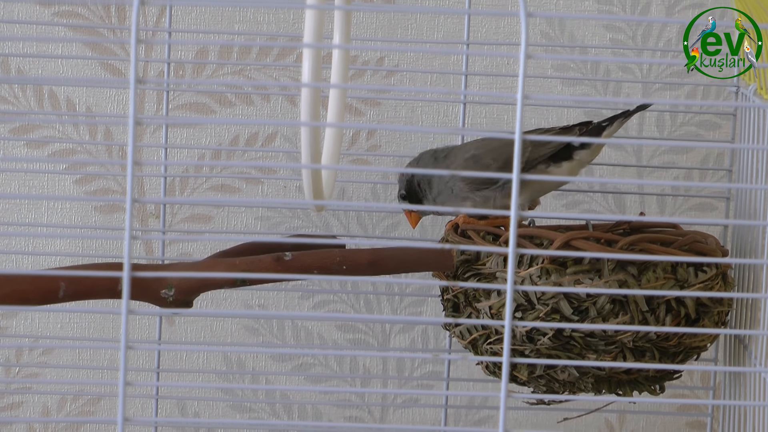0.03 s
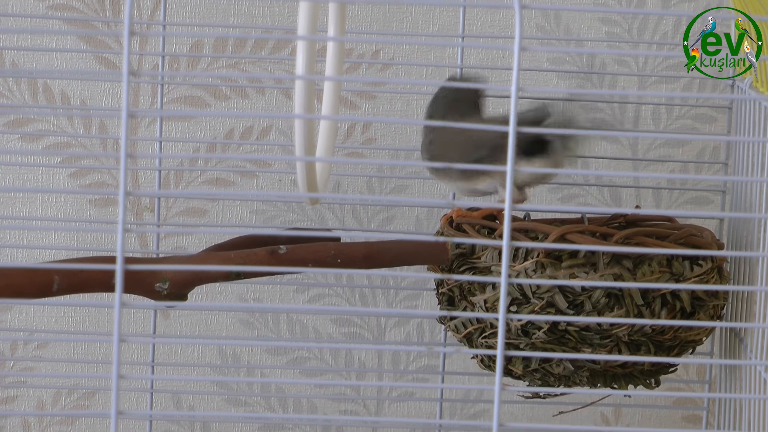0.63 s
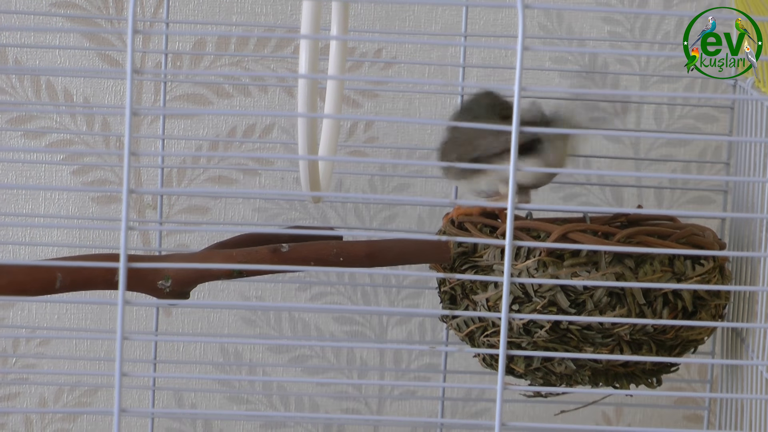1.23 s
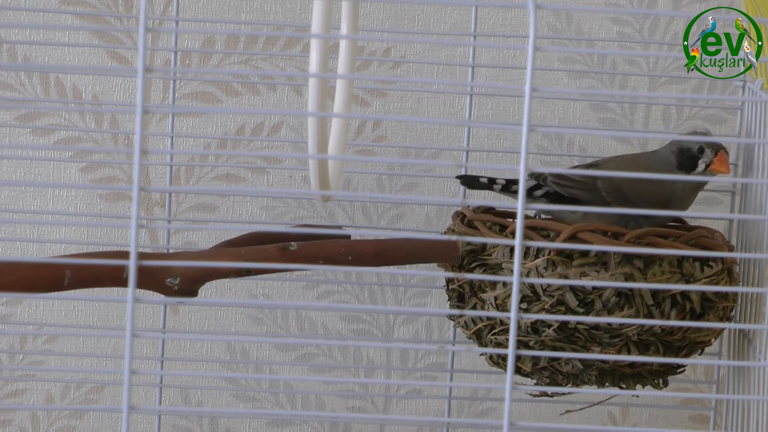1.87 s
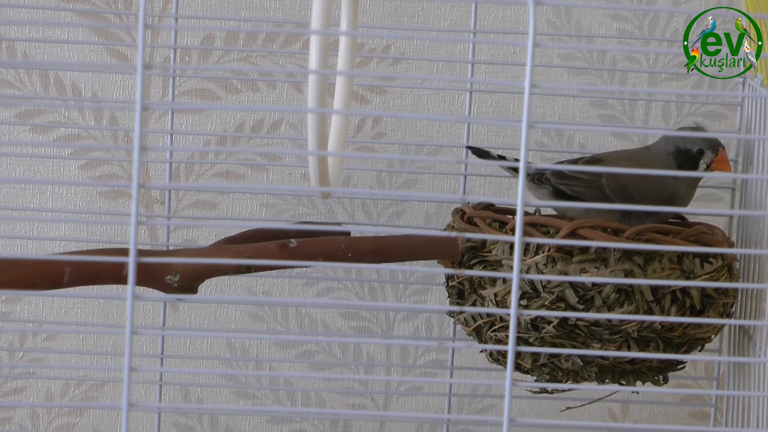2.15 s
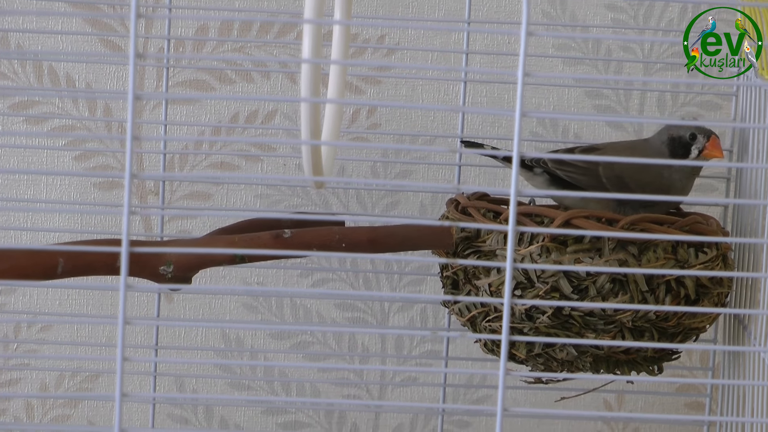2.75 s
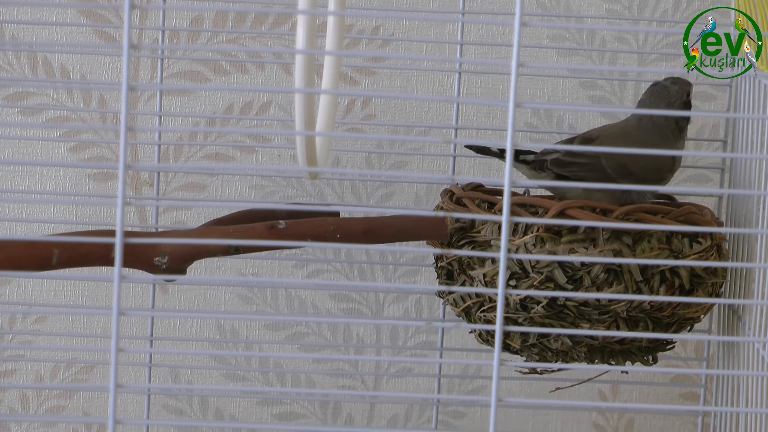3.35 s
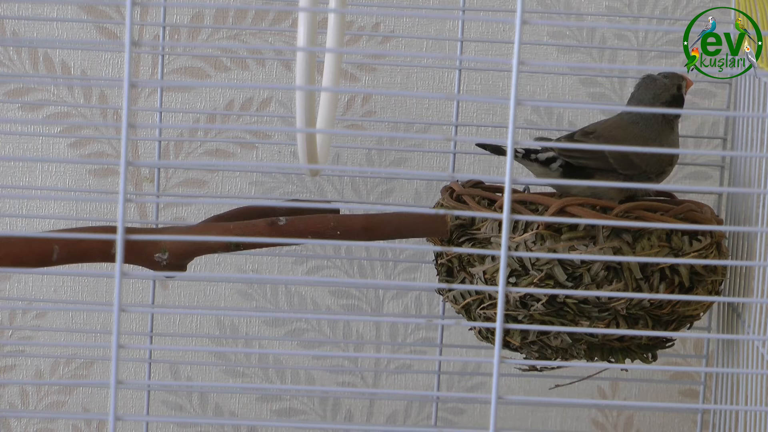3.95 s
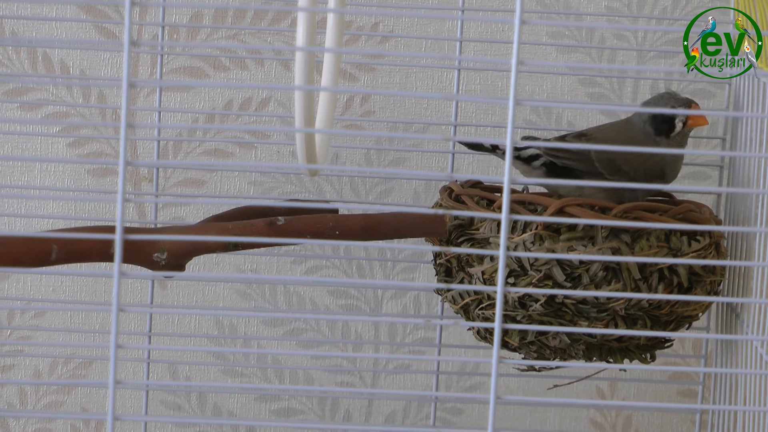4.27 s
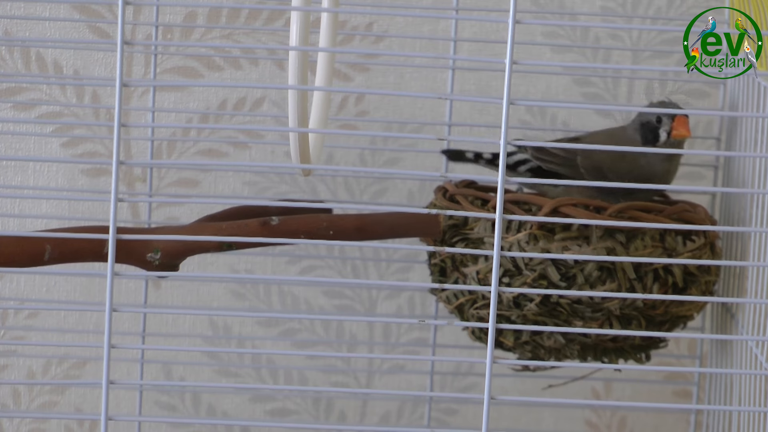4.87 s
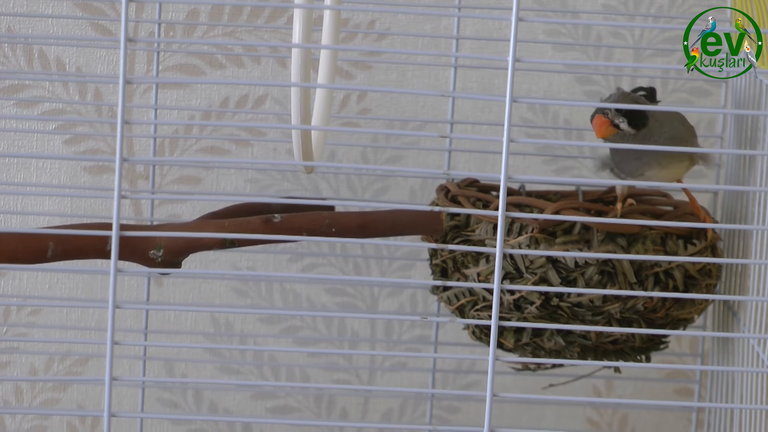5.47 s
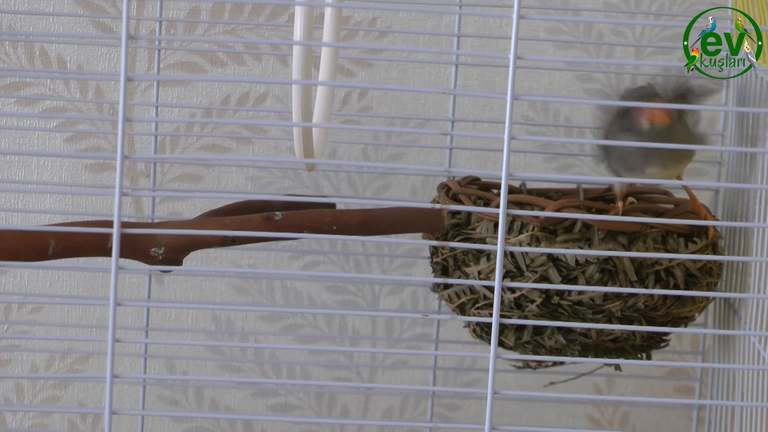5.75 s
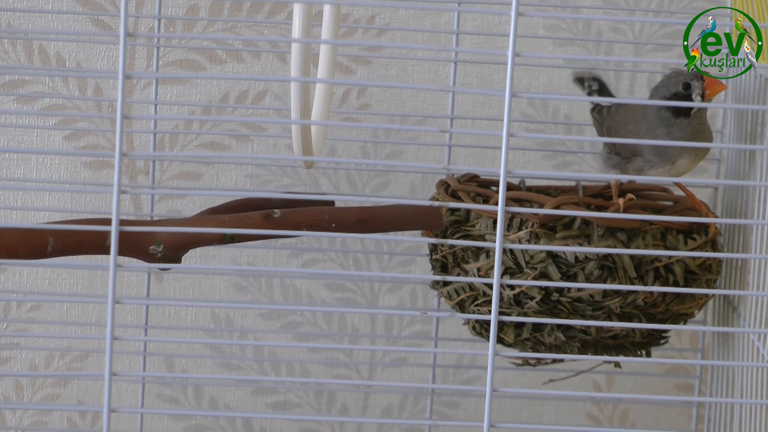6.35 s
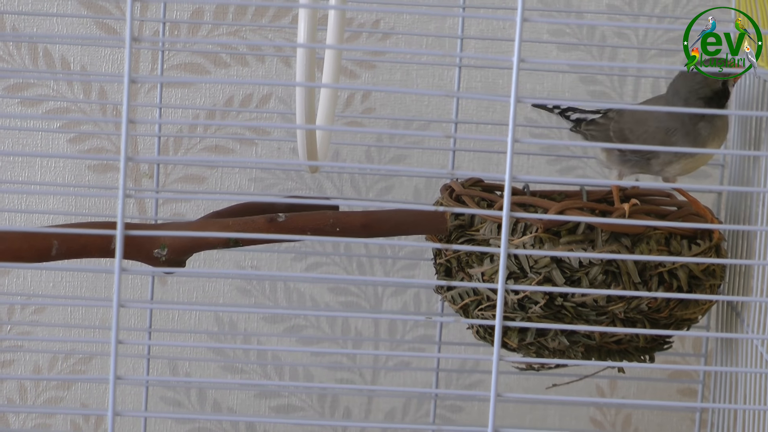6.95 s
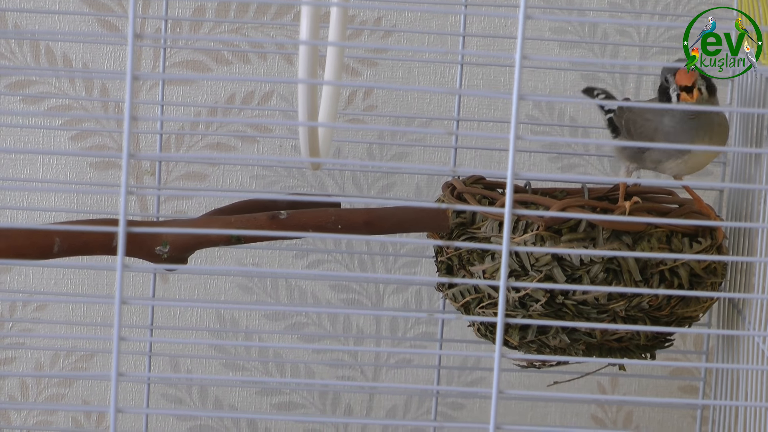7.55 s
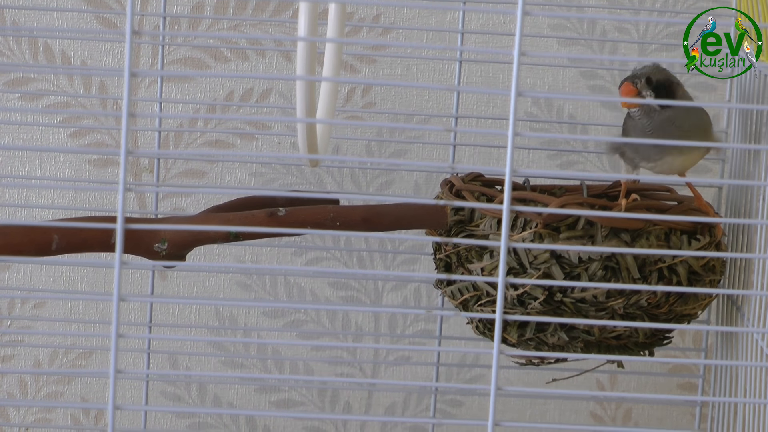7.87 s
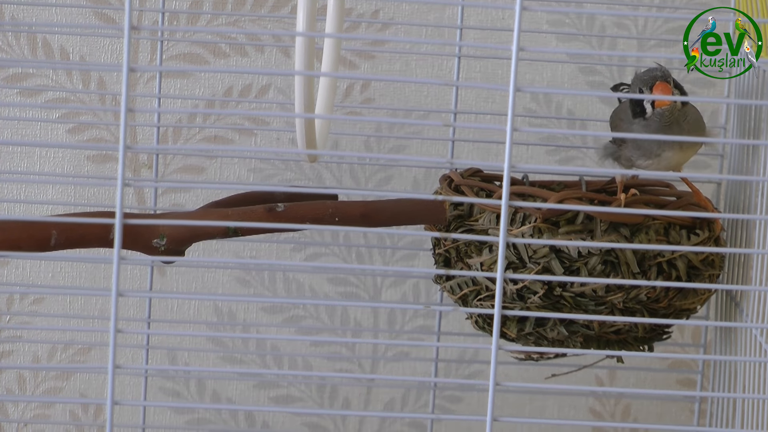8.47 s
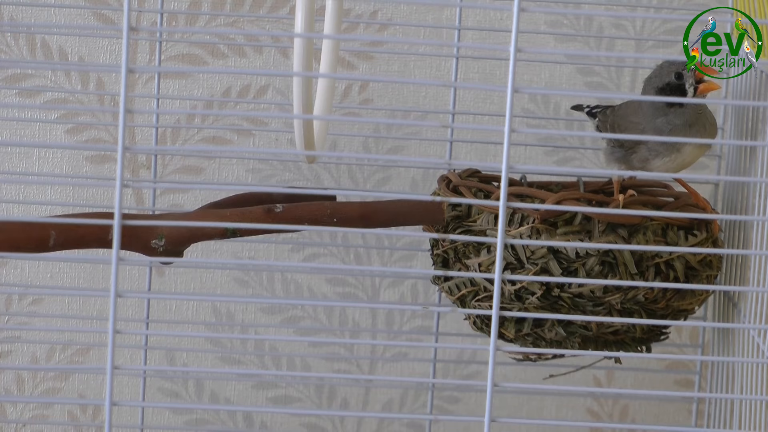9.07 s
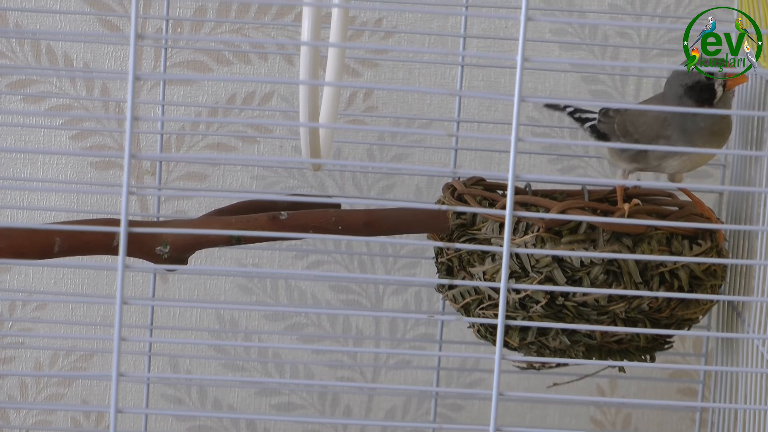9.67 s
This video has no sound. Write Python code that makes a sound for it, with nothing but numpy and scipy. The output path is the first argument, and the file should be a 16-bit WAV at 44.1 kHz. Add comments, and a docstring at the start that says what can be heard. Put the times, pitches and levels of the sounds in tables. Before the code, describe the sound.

A small finch calls close by in a cage, over faint indoor hum and hiss. Its soft, nasal, arching whines come at about 0.2, 1.2, 2.7, 3.5, 4, 5.4 and 7.3 seconds. Short notes break into high whistles near 0.4, 2.4, 3, 5.3 and 7.2 seconds. A second finch, further off, slightly right and more echoing, gives brief rasps at 0.3, 1.4 and 3.4 seconds and soft replies at 0.9, 1.7 and 4.5 seconds. Its three louder buzzy calls, at 5.9, 7.9 and 9.7 seconds, stand out most. Feathers rustle lightly on the wicker nest through the first six seconds, with a few claw ticks. From 4 to 4.7 seconds wings whirr in a quick flurry, puffing air at the microphone. A faint air rumble lies between 3 and 6 seconds.

```python
"""A soft, arched whine rises over quiet room hum: a zebra finch on its wicker nest in a wire cage.
Its short notes break into whistles; its mate answers from further off with louder calls and rasps.
Each call is a buzz of the syrinx shaped by the throat, each rasp a burst of chaotic pulses.
Feathers rustle, claws catch, and wings whirr and puff air at the microphone."""
import sys
import numpy as np
from scipy import signal
from scipy.fft import rfft, irfft, next_fast_len
from scipy.io import wavfile

SR = 44100
rng = np.random.default_rng(int(sys.argv[2]) if len(sys.argv) > 2 else 0)


def transcribe(signal):
    """Save signal, clipped to [-1, 1], as a 16-bit WAV file at the path in sys.argv[1]."""
    frames = np.atleast_2d(signal).T
    limited = np.clip(frames, -1, 1)
    pcm = np.round(limited * 32767).astype(np.int16)
    wavfile.write(sys.argv[1], SR, pcm)


N = 429081
TIME = np.arange(N) / SR


def amp(db):
    """Decibels to gain."""
    return 10 ** (np.asarray(db) / 20)


def unit(x):
    """Scales to rms 1."""
    return x / np.sqrt(np.mean(x ** 2) + 1e-20)


def read(points, hz):
    """Reads a curve on a log-frequency axis."""
    f, value = np.transpose(points)
    return np.interp(np.log(hz + 1), np.log(f + 1), value)


def follow(rows):
    """Sample times over a table's span, and its columns along them."""
    s, *columns = np.transpose(rows)
    t = np.arange(s[0], s[-1], 1 / SR)
    return [t] + [np.interp(t, s, c) for c in columns]


def add(mix, s, sound):
    """Mixes a sound in at time s."""
    part = mix[..., max(round(s * SR), 0):][..., :sound.shape[-1]]
    part += sound[..., :part.shape[-1]]


def equalise(x, eq):
    """Shapes x with an EQ curve, at rms 1."""
    return unit(irfft(rfft(x) * amp(read(eq, np.fft.rfftfreq(len(x), 1 / SR))), len(x)))


def noise(n, eq):
    """Noise through an EQ curve, at rms 1."""
    return equalise(rng.standard_normal(n), eq)


def wander(n, hz):
    """Random modulation of rms 1, rolling off above hz."""
    size = next_fast_len(n + 8192)
    f = np.fft.rfftfreq(size, 1 / SR)
    return unit(irfft(rfft(rng.standard_normal(size)) / (1 + (f / hz) ** 4), size))[:n]


def fade(t, edge_s):
    """Short ramps at both ends of a call."""
    return np.clip(np.minimum(t - t[0], t[-1] - t) / edge_s, 0, 1)


# reverb time of the room: (f/Hz, T60/s)
ROOM_DECAY = [(300, 0.44), (1200, .44), (3000, 0.4727), (5000, 0.48), (8000, 0.38), (14000, 0.29)]
def room(x, direct_db, cage_db, tail_db, cage_decay_s, width):
    """Direct sound, quick echoes from the cage corner and the room's tail, in narrow stereo."""
    size = 26400
    taps = np.zeros((2, size))
    slots = np.arange(88, size - 20, 20)  # one reflection of random sign in each
    shape = (2, len(slots))
    np.put_along_axis(taps, slots + rng.integers(0, 20, shape), rng.choice([-1., 1.], shape), 1)
    hz, t, spectra = signal.stft(taps, SR, nperseg=256)
    damping = amp(-60 * t / read(ROOM_DECAY, hz)[:, None])
    tail = signal.istft(spectra * damping, SR, nperseg=256)[1][:, :size]
    cage = taps * np.exp(-TIME[:size] / cage_decay_s)
    echoes = amp(tail_db) * tail / np.linalg.norm(tail[0])
    echoes += amp(cage_db) * cage / np.linalg.norm(cage[0])
    mid, side = signal.oaconvolve(x[None], echoes, axes=1)[:, :N]
    return amp(direct_db) * x + mid + width * np.array([side, -side])


# noise bed of the room: (f/Hz, gain/dB)
BED_EQ = [(12, -55), (20, -18), (36, -13), (113, -6.5), (176, -7), (203, -3), (268, -8.5), (291, -6.5),
          (385, -11), (481, -21.5), (538, -16), (602, -19.5), (818, -13.5), (915, -36), (994, -22),
          (1310, -25), (1790, -21.5), (2170, -21), (15800, -34.5)]
# its stereo image: (f/Hz, left-right correlation/0-1)
BED_CORRELATION = [(60, 0.19), (130, 0.79), (290, 0.31), (640, 0.31), (1410, 0.77), (3100, 0.916),
                   (6820, 0.921), (15000, 1)]
# thin drones: (f/Hz, level/dB)
DRONES = [(204.6, -73), (640.6, -78.5), (839.8, -75), (1680, -84), (1814, -81)]
# a low hum that swells and dies away: (t/s, f/Hz, level/dB)
PASSING_HUM = [(.48, 134.4, -65), (.58, 126.3, -60), (.68, 111.1, -62), (.77, 102.7, -44),
               (.9, 104.4, -50.5), (1.05, 99.3, -60.5), (1.3, 102.4, -69), (1.4, 125.7, -57),
               (1.55, 117, -70)]
def room_tone(bed_db=-59, ring_t60_s=.5):
    """Steady hiss, wavering drones, a passing hum, and the dying ring of an earlier call."""
    mid, side = noise(N, BED_EQ), noise(N, BED_EQ)
    correlation = np.clip(read(BED_CORRELATION, np.fft.rfftfreq(N, 1 / SR)), 0, 1)
    mid = irfft(rfft(mid) * np.sqrt((1 + correlation) / 2), N)
    side = irfft(rfft(side) * np.sqrt((1 - correlation) / 2), N)
    out = amp(bed_db) * np.array([mid + side, mid - side])
    for hz, db in DRONES:
        out += amp(db) * unit(np.sin(2 * np.pi * hz * TIME + 1.08 * wander(N, 3.6)))
    t, hz, level_db = follow(PASSING_HUM)
    hum = np.sin(2 * np.pi * np.cumsum(hz) / SR + .55 * wander(len(t), 22))
    add(out, t[0], amp(level_db) * unit(hum))
    ring_eq = [(1000, -20.5), (2200, -2), (3000, 4), (4200, -1.5), (5500, -17.5), (9000, -39.5)]
    ring = noise(16384, ring_eq)
    add(out, 0, amp(-45 - 60 * TIME[:len(ring)] / ring_t60_s) * ring)
    return out


# fader ride of the draught: (t/s, level/dB)
DRAUGHT_RIDE = [(2.1, -74), (2.75, -73), (2.9, -57), (3.7, -59.5), (4, -60), (4.8, -55.5), (5.1, -61.5),
                (5.35, -54.5), (5.9, -73.5)]
# its rumble: (f/Hz, gain/dB)
DRAUGHT_EQ = [(15, -6), (30, -1), (50, -16), (150, -14.5), (300, -31), (1000, -70.5)]
def draught():
    """Slow air rumbles on the microphone."""
    out = np.zeros(N)
    t, level_db = follow(DRAUGHT_RIDE)
    add(out, t[0], amp(level_db) * noise(N, DRAUGHT_EQ)[:len(t)])
    return out


# soft wafts as the bird shifts on the nest: (t/s, level/dB, rise and decay/s)
NEST_WAFTS = [(3.096, -60, 0.042), (3.271, -65, 0.023), (4.799, -63.5, 0.008), (5.324, -57.5, 0.036)]
# dull thud of moving air: (f/Hz, gain/dB)
PUFF_EQ = [(25, -2), (60, 1), (130, 1.5), (300, -4), (600, -9.5), (1200, -18), (2500, -18), (6000, -58)]
def air_puffs(wing_puffs):
    """Air pushed by wings and body swells and fades on the microphone."""
    out, t = np.zeros(N), np.arange(-2048, 2048) / SR
    for s, db, decay_s in wing_puffs + NEST_WAFTS:
        add(out, s + t[0], amp(db) * np.exp(-abs(t) / decay_s) * noise(len(t), PUFF_EQ))
    return out


def feathers(bouts, eq, grain_db, grain_hz):
    """Barbs slide over each other in a grainy hiss; each bout rises, holds and dies away."""
    envelope = np.zeros(N)
    for s, attack, hold, decay, db in bouts:
        rise = np.clip((TIME - s) / attack, 0, 1)
        envelope += amp(db) * rise * np.exp(-np.maximum(TIME - s - attack - hold, 0) / decay)
    return envelope * unit(noise(N, eq) * amp(grain_db * wander(N, grain_hz)))


# rustles in plumage and nest, and wing whirrs: (t/s, attack/s, hold/s, decay/s, level/dB)
RUSTLES = [(.57, 0.022, 0.0766, 0.104, -53.5), (1.3, 0.116, .01, 0.057, -47.5),
           (1.6, 0.029, 0.021, 0.178, -54), (2.7, .2, 2.7, .2, -60), (5, 0.0207, 0.016, 0.054, -58)]
WHIRRS = [(4.03, 0.09, .02, 0.0266, -47), (4.22, 0.043, 0.157, 0.0545, -46.5),
          (4.47, 0.129, 0.052, 0.025, -47.5)]
# their tone: (f/Hz, gain/dB)
RUSTLE_EQ = [(800, -8.5), (1600, -11), (2800, -2), (4300, -8), (5500, -4), (6500, -5), (8300, -17),
             (10500, -16.5), (15500, -18.5)]
WHIRR_EQ = [(710, -47), (1200, -7.5), (1410, -15), (1940, -6), (3320, -39), (3850, -10.5), (4930, -7),
            (6370, -5), (7410, 5.5), (9680, -11), (15500, -20.5)]
def plumage():
    """Feathers rub: a fine rustle on the nest, a coarser whirr from the wings."""
    rustle = feathers(RUSTLES, RUSTLE_EQ, grain_db=1.5, grain_hz=88.6)
    return rustle + feathers(WHIRRS, WHIRR_EQ, grain_db=4.5, grain_hz=60)


def snaps(rows, eq, decay_s, trim_db=-2):
    """Brief contacts that hardly ring: fast-decaying noise bursts."""
    out, t = np.zeros(N), np.arange(2048) / SR
    for s, db in rows:
        add(out, s, amp(db + trim_db) * np.exp(-t / decay_s) * noise(len(t), eq))
    return out


# claws on the wicker, and a foot on the cage: (t/s, level before trim/dB)
CLAW_TICKS = [(1.3941, -37.5), (1.4632, -43), (1.9949, -48.5), (4.6713, -31.5), (4.7048, -36.5),
              (4.776, -46), (5.03, -43), (5.155, -48)]
FOOT_KNOCKS = [(2.1445, -48), (6.671, -49)]
# bright tick of claw or feather, and duller knock: (f/Hz, gain/dB)
TICK_EQ = [(500, -14.5), (2500, -24), (5000, -7.5), (7500, 3.5), (10000, -8.5), (15000, -18)]
KNOCK_EQ = [(150, -19.5), (450, -4.5), (850, -4.5), (1500, -7.5), (2600, -2.5), (4000, -8), (7000, -15.5),
            (14000, -28)]
def contacts(wing_flicks):
    """Feathers flick, claws catch and a foot knocks lightly."""
    ticks = snaps(wing_flicks + CLAW_TICKS, TICK_EQ, decay_s=.004)
    return ticks + snaps(FOOT_KNOCKS, KNOCK_EQ, decay_s=.0099)


# a flurry of wings: (t/s, flick level before trim/dB, puff level/dB)
WING_STROKES = [(4.152, -36, -48), (4.187, -37.5, -62), (4.232, -33.5, -41.5), (4.264, -32, -37.5),
                (4.305, -32.5, -36), (4.338, -39.5, -57), (4.392, -40, -41), (4.462, -46, -45),
                (4.493, -32.5, -37.5), (4.526, -48, -62.5), (4.575, -35, -53), (4.595, -43, -47.5),
                (4.636, -37, -57)]
def wing_beats(air_lag_s=.005, puff_decay_s=.0098):
    """Cue lists for the wings: each stroke flicks the feathers, and its air arrives just after."""
    flicks = [(s, db) for s, db, _ in WING_STROKES]
    puffs = [(s + air_lag_s, db, puff_decay_s) for s, _, db in WING_STROKES]
    return flicks, puffs


ONSET_TREBLE_DB, MELLOW_S = 10, .022  # calls start bright and mellow
SWELL_LATE = 1.174  # above 1, a swell peaks after its middle


def call(contour, echoes, voice_eq, jitter, onset_jitter, settle_s, air_db, throat_db, throat_width_hz,
         shimmer, hoarseness=.302):
    """The syrinx buzzes, unsteady until it settles; throat and close reflections pick out harmonics."""
    t, pitch, level_db, throat_hz, treble_db = follow(contour)
    onset = np.exp(-(t - t[0]) / settle_s)
    unsteady = jitter + onset_jitter * onset
    cycles = np.cumsum(pitch * (1 + unsteady * wander(len(t), 300))) / SR
    order = np.arange(1, 27)[:, None]
    hz = order * pitch
    throat = 1 + amp(throat_db) / (1 + 2j * (hz - throat_hz) / throat_width_hz)
    comb = 1 + sum(strength * np.exp(-2j * np.pi * hz * ms / 1000)
                   for ms, strength in (echoes[:2], echoes[2:]))
    gain = amp(read(voice_eq, hz)) * throat * comb / (1 + (hz / 11500) ** 10)
    # the windpipe delays high harmonics more, which spreads each pulse
    gain *= np.exp(-1j * .12 * order ** 2)
    # a sharper closing of the syrinx feeds the treble
    high = np.clip((hz - 5700) / 900, 0, 1)
    body, treble = (g / np.sqrt((abs(g) ** 2).sum(0) / 2) for g in (gain * (1 - high), gain * high))
    buzz = ((body + amp(treble_db) * treble) * np.exp(2j * np.pi * order * cycles)).real.sum(0)
    buzz *= 1 + shimmer * wander(len(t), 140)
    # breathy turbulence is strongest before the vibration takes hold
    air = equalise(rng.standard_normal(len(t)) * (1 + np.cos(2 * np.pi * cycles)), voice_eq)
    hoarse = np.clip(amp(air_db) + hoarseness * onset, 0, 1)
    envelope = amp(level_db) * fade(t, .004)
    return t[0], envelope * (np.sqrt(1 - hoarse ** 2) * buzz + hoarse * air)


def two_step(row, step_s, glide_s, scoop, droop, droop_power, soft_db, attack_s, tire_db, shut):
    """Call contour: settles onto a low note, glides to a high one as the beak opens, then droops."""
    s, length, low_hz, high_hz, level_db, throat_hz, treble_db = row
    progress = np.linspace(0, 1, 64)
    t = progress * length
    opening = (1 + np.tanh((t - step_s) / glide_s)) / 2
    onset = np.exp(-t / MELLOW_S)
    bend = 1 + scoop * onset - droop * progress ** droop_power
    pitch = (low_hz + (high_hz - low_hz) * opening) * bend
    level = level_db - soft_db * np.exp(-t / attack_s) - tire_db * progress
    throat = throat_hz * (1 - shut * (1 - opening))
    return np.transpose([s + t, pitch, level, throat, treble_db + ONSET_TREBLE_DB * onset])


def gape(s, length, level_db, open_hz, shut_hz=2360, swell_db=11.5):
    """Rasp contour: the beak opens and shuts once, lifting level and throat resonance."""
    progress = np.linspace(0, 1, 16)
    opening = np.sin(np.pi * progress ** SWELL_LATE)
    level = level_db - swell_db * (1 - opening)
    return np.transpose([s + progress * length, level, shut_hz + (open_hz - shut_hz) * opening])


# harsh rasps of the mate: (t/s, length/s, level/dB, open throat resonance/Hz)
MATE_RASPS = [(0.288, 0.0448, -29, 2880), (1.36, 0.0434, -29, 2754), (3.378, .051, -23, 3904)]
# their tone: (f/Hz, gain/dB)
RASP_EQ = [(500, -15), (1200, -16), (1900, -4.5), (3000, -4.5), (4600, -6), (6000, -10), (7500, -18.5),
           (10000, -13.5), (14000, -31.5)]
def mate_rasps(rate_hz=620, chaos=.3, width_hz=1000):
    """Chaotic pulses ring a moving throat resonance."""
    out = np.zeros(N)
    pole = np.exp(-np.pi * width_hz / SR)
    for row in MATE_RASPS:
        t, level_db, throat_hz = follow(gape(*row))
        cycles = np.cumsum(rate_hz * (1 + chaos * wander(len(t), 500))) / SR
        pulses = np.diff(np.floor(cycles), prepend=0) * rng.uniform(.86, 1, len(t))
        pulses += .0177 * rng.standard_normal(len(t))
        sweep = np.exp(2j * np.pi * np.cumsum(throat_hz) / SR)
        ringing = (sweep * signal.lfilter([1 - pole], [1, -pole], pulses / sweep)).real
        add(out, t[0], amp(level_db) * fade(t, .0024) * equalise(ringing, RASP_EQ))
    return out


# the mate's calls: (t/s, length/s, low f/Hz, high f/Hz, level/dB, throat/Hz, treble/dB re level)
SOFT_REPLIES = [(.908, 0.1165, 511.2, 540.4, -25.5, 3360, -29),
                (1.663, 0.0863, 499.1, 528.9, -31, 3084, -30.5),
                (4.478, .099, 498.4, 548.2, -31.5, 3250, -31)]
LOUD_REPLIES = [(5.869, 0.1303, 530.4, 624.4, -18.5, 3540, -26),
                (7.928, .14, 529.5, 617.1, -18.5, 3640, -24.5),
                (9.688, .138, 522.2, 620.6, -16.5, 3930, -28.5)]
# two close reflections, a row a call as the head turns: (delay/ms, gain, delay/ms, gain)
SOFT_COMBS = [(1.553, 0.328, 0.312, -0.00058), (0.331, 0.096, 1.053, 0.19), (.31, 0.163, 1.18, -0.071)]
LOUD_COMBS = [(1.039, 0.172, 0.154, -0.11), (1.4, -0.3, 0.618, 0.14), (0.918, 0.334, 1.7, -0.063)]
# its voice before the throat resonance: (f/Hz, gain/dB)
SOFT_EQ = [(550, -16), (1100, -9), (1600, -12), (2100, 1.5), (2650, -2), (3200, -1.5), (3900, -1),
           (4500, -0.5), (5300, -13.5), (6300, -19), (8000, -21.5), (9500, -19), (11500, -32.5),
           (14000, -22)]
LOUD_EQ = [(600, -15), (1150, -11), (1700, -13.5), (2150, -2.5), (2500, -2.5), (3100, 1.5), (3700, 2.5),
           (4300, 3), (5000, 0.5), (5700, -9), (6500, -22), (8000, -27.5), (10500, -19), (12000, -27),
           (14000, -26)]
def mate_calls():
    """The mate's syrinx gives soft, nearly flat replies and loud calls with a hoarse start."""
    out = np.zeros(N)
    for row, echoes in zip(SOFT_REPLIES, SOFT_COMBS):
        contour = two_step(row, step_s=.038, glide_s=.006, scoop=.035, droop=.05, droop_power=3,
                           soft_db=11, attack_s=.024, tire_db=2, shut=.14)
        add(out, *call(contour, echoes, SOFT_EQ, jitter=.0103, onset_jitter=.032, settle_s=.0083,
                       air_db=-27, throat_db=11, throat_width_hz=927, shimmer=.08))
    for row, echoes in zip(LOUD_REPLIES, LOUD_COMBS):
        contour = two_step(row, step_s=.045, glide_s=.016, scoop=.012, droop=.062, droop_power=9.2,
                           soft_db=20, attack_s=.0245, tire_db=4, shut=.168)
        add(out, *call(contour, echoes, LOUD_EQ, jitter=.006, onset_jitter=.04, settle_s=.011,
                       air_db=-26, throat_db=11, throat_width_hz=1140, shimmer=.08, hoarseness=.9))
    return out


# whistles that end short notes: (t/s, length/s, level/dB, f/Hz, second harmonic/dB)
NEAR_WHISTLES = [(.44, 0.0389, -26, 4180, -17), (2.4, 0.0416, -30.5, 4158, -14.5),
                 (3.01, 0.0434, -26.5, 4154, -18), (5.291, 0.0459, -33.5, 4313, -20),
                 (7.228, 0.042, -33.5, 4256, -20)]
# contour of each: (position/0-1, pitch ratio, gain/dB, flutter/0-1)
WHISTLE_CONTOUR = [(0, 1, -7, .1), (.2, 1.006, 0, .1), (.5, .995, -1, .2), (.72, .975, 1, .8),
                   (1, .975, -6, .6)]
def near_whistles(third_db=-41, vibrato=.03, tremolo=.81):
    """The near bird's voice breaks into a nearly pure tone that sags and flutters before it stops."""
    out = np.zeros(N)
    position, *columns = np.transpose(WHISTLE_CONTOUR)
    for s, length, level_db, pitch_hz, second_db in NEAR_WHISTLES:
        t = np.arange(0, length, 1 / SR)
        bend, swell_db, flutter = (np.interp(t / length, position, c) for c in columns)
        hz = pitch_hz * bend * (1 + vibrato * flutter * wander(len(t), 450))
        phase = 2 * np.pi * np.cumsum(hz) / SR
        tone = np.sin(phase) + amp(second_db) * np.sin(2 * phase) + amp(third_db) * np.sin(3 * phase)
        tone *= 1 + tremolo * flutter * wander(len(t), 330)
        add(out, s, amp(level_db + swell_db) * fade(t, .0043) * unit(tone))
    return out


def whine(s, length, top_hz, top_at, climb, level_db, swell_db, throat_hz, treble_db,
          fall=.11, throat_follows=.72):
    """Call contour for one push of air: pitch and throat arch while the level swells."""
    progress = np.linspace(0, 1, 64)
    t = progress * length
    sag = climb * np.maximum(1 - progress / top_at, 0) ** 2.5
    sag += fall * np.maximum((progress - top_at) / (1 - top_at), 0) ** 2.7
    effort = np.sin(np.pi * progress ** SWELL_LATE)
    level = level_db - swell_db * (1 - effort)
    throat = throat_hz * (1 - throat_follows * sag)
    treble = treble_db + ONSET_TREBLE_DB * np.exp(-t / MELLOW_S)
    return np.transpose([s + t, top_hz * (1 - sag), level, throat, treble])


# arched whines: (t/s, length/s, top f/Hz, top position/0-1, climb/share of top f, level/dB,
# swell/dB, throat/Hz, treble/dB re level)
NEAR_WHINES = [(.154, 0.2058, 632.1, 0.52, 0.218, -27.5, 10, 3424, -16),
               (1.185, 0.187, 607.7, 0.51, 0.187, -33.5, 4.5, 3630, -14),
               (2.691, 0.202, 663, 0.55, 0.186, -25.5, 8.5, 4253, -15),
               (3.516, 0.1913, 631, 0.51, .18, -31.5, 4.5, 3190, -13.5),
               (4.009, 0.1178, 601.3, .501, 0.13, -31.7, 5, 3510, -15),
               (5.369, 0.2012, 664.5, 0.35, 0.191, -29, 7, 4300, -13.5),
               (7.34, 0.2088, 648.4, 0.44, 0.1515, -30, 8, 4270, -11.5)]
# short rising notes: (t/s, length/s, low f/Hz, high f/Hz, level/dB, throat/Hz, treble/dB re level)
NEAR_NOTES = [(0.381, 0.0515, 542.7, 658.2, -39.5, 3520, -12.5),
              (2.342, 0.0535, 539.2, 646, -42, 3430, -9.5), (2.948, 0.0567, 541, 662.2, -38, 3270, -18.5),
              (4.209, 0.0697, 513.2, 557.9, -42.5, 2940, -7.5),
              (5.237, 0.0483, 547.6, 658.5, -44, 3420, -10.5),
              (7.173, 0.054, 519.3, 660.2, -47, 3130, -12.5)]
# two close reflections, a row a call as the head turns: (delay/ms, gain, delay/ms, gain)
WHINE_COMBS = [(0.193, 0.372, 1.933, -0.072), (0.504, -0.196, 1.705, 0.32), (0.147, -0.121, 1.3, -0.0065),
               (0.234, 0.224, 0.638, 0.06), (0.186, -0.2, 0.77, -0.014), (0.723, -0.244, .42, -.33),
               (.41, -.34, 1.04, 0.31)]
NOTE_COMBS = [(0.392, 0.16, 1.623, 0.54), (0.3, -0.37, 0.189, -0.39), (0.424, 0.22, 1.155, -0.345),
              (0.0974, 0.65, 1.242, -0.64), (0.24, -0.23, 1.44, 0.43), (0.211, -0.46, 1.438, 0.5)]
# the near voice before the throat resonance: (f/Hz, gain/dB)
NEAR_EQ = [(600, -18), (1250, -7.5), (1800, -12.5), (2600, -7), (3400, -3.5), (4300, -5.5), (5500, -7),
           (6400, -8.5), (7300, -1.5), (8500, -12.5), (10100, -11), (11200, -18.5), (14000, -12.5)]
def near_calls():
    """The near bird's syrinx gives clean whines and breathier notes that step up in pitch."""
    out = np.zeros(N)
    for row, echoes in zip(NEAR_WHINES, WHINE_COMBS):
        add(out, *call(whine(*row), echoes, NEAR_EQ, jitter=.003, onset_jitter=.014, settle_s=.02,
                       air_db=-33, throat_db=10, throat_width_hz=1800, shimmer=.05))
    for row, echoes in zip(NEAR_NOTES, NOTE_COMBS):
        contour = two_step(row, step_s=.023, glide_s=.00606, scoop=.014, droop=.0062, droop_power=2.6,
                           soft_db=3.5, attack_s=.0476, tire_db=-3.4, shut=.018)
        add(out, *call(contour, echoes, NEAR_EQ, jitter=.0101, onset_jitter=.0115, settle_s=.0164,
                       air_db=-16.5, throat_db=15, throat_width_hz=2900, shimmer=.215))
    return out


def scene():
    """The near bird is fairly dry and central; its mate is wetter and a little to the right."""
    wing_flicks, wing_puffs = wing_beats()
    nest = plumage() + contacts(wing_flicks) + near_calls()
    near = room(nest, direct_db=-.5, cage_db=-10.5, tail_db=-28, cage_decay_s=.03125, width=.027)
    near += room(near_whistles(), direct_db=-1, cage_db=-9.5, tail_db=-30, cage_decay_s=.023, width=.05)
    mate = mate_calls() + mate_rasps()
    far = room(mate, direct_db=-1.5, cage_db=-5, tail_db=-4, cage_decay_s=.00091, width=.17)
    pan_right = amp([[-.5], [.5]])
    return near + far * pan_right + air_puffs(wing_puffs) + draught() + room_tone()


def record(dry, cutoff_hz=15850):
    """A steep low-pass trims the top of the mix."""
    lowpass = signal.firwin(511, cutoff_hz, window=("kaiser", 9), fs=SR)
    return signal.oaconvolve(dry, lowpass[None], "same")


dry = scene()
out = record(dry)
transcribe(out)
```